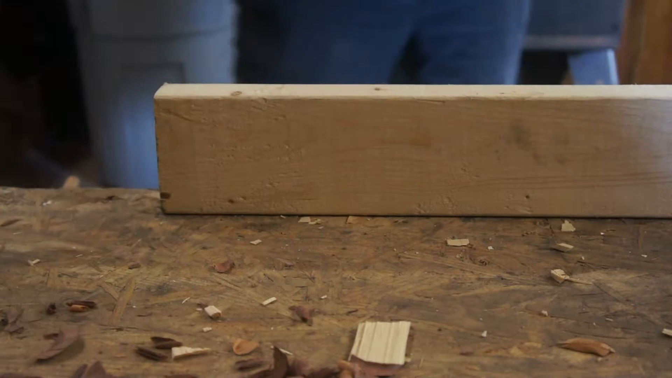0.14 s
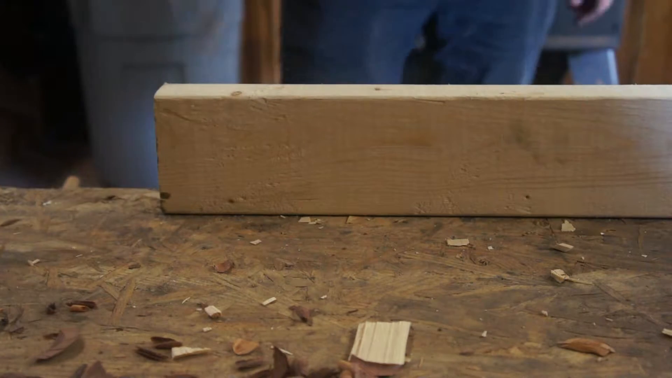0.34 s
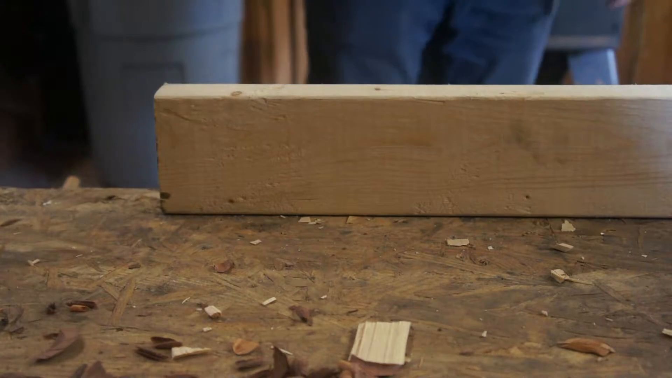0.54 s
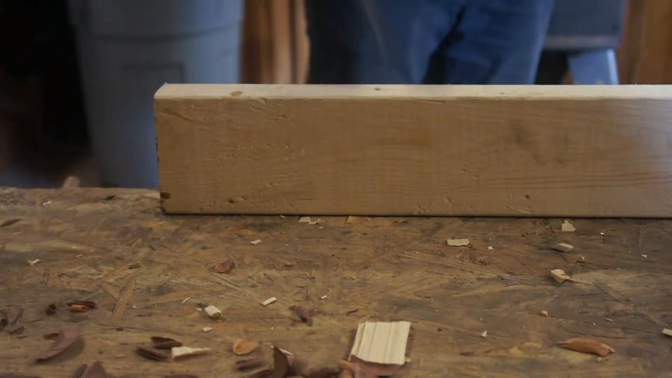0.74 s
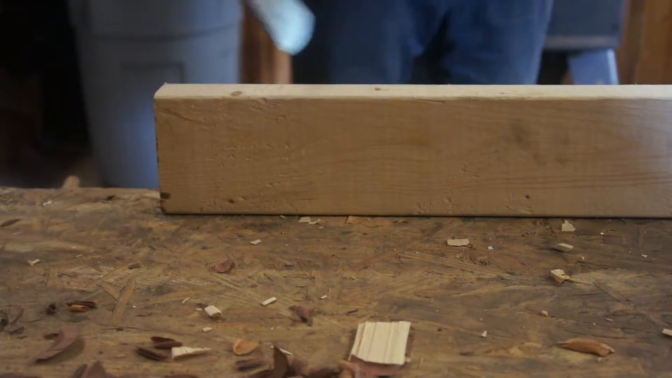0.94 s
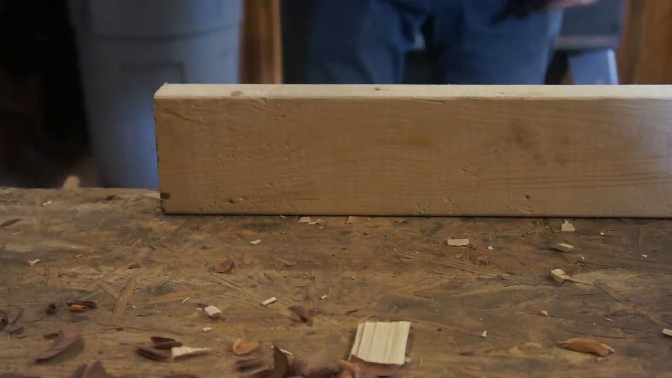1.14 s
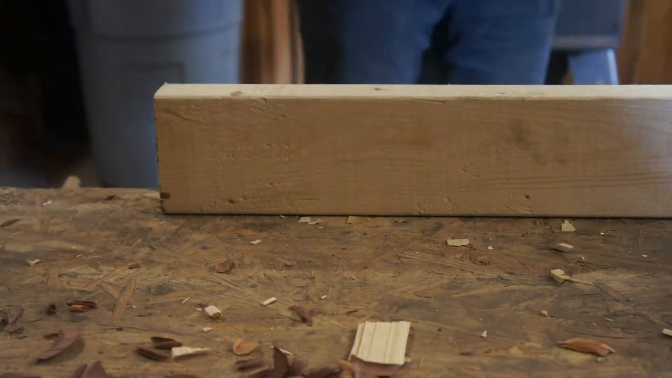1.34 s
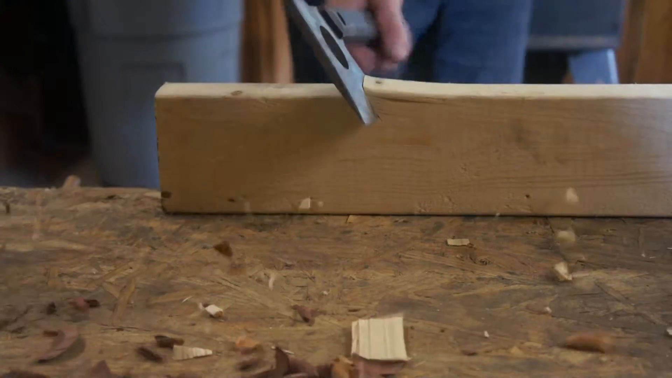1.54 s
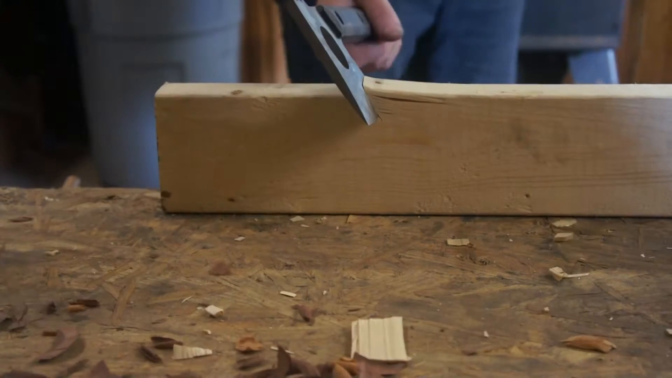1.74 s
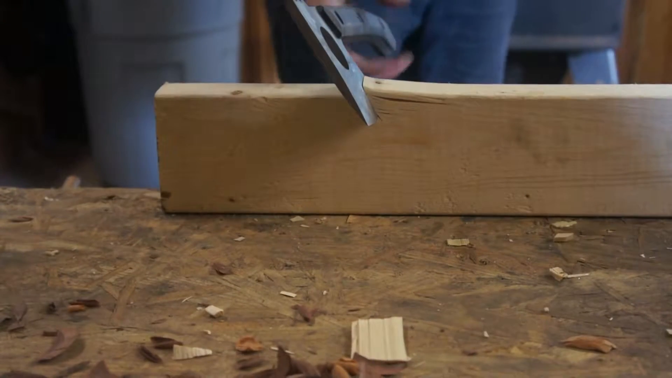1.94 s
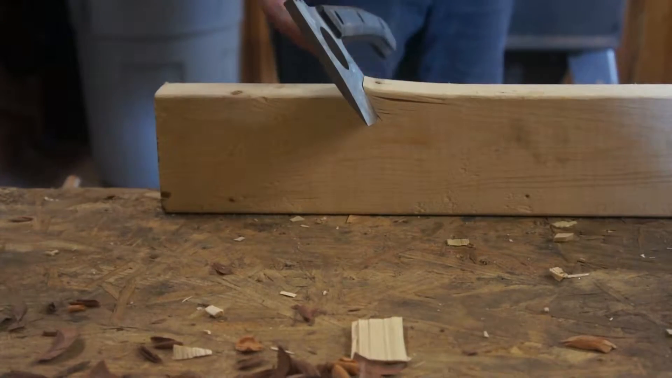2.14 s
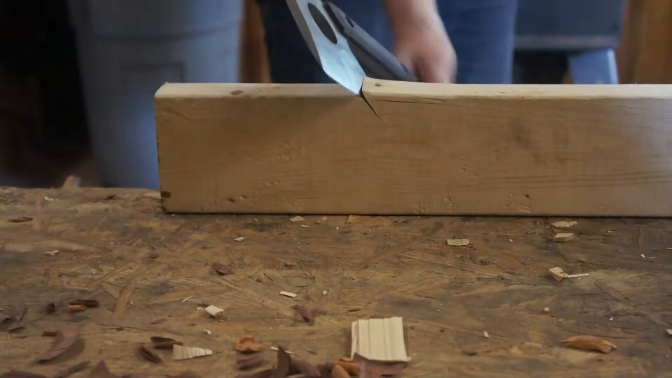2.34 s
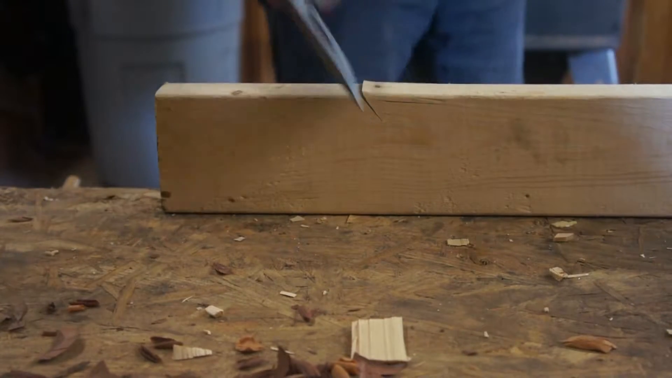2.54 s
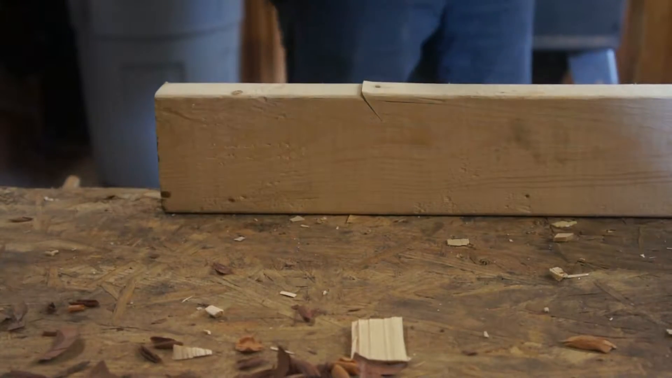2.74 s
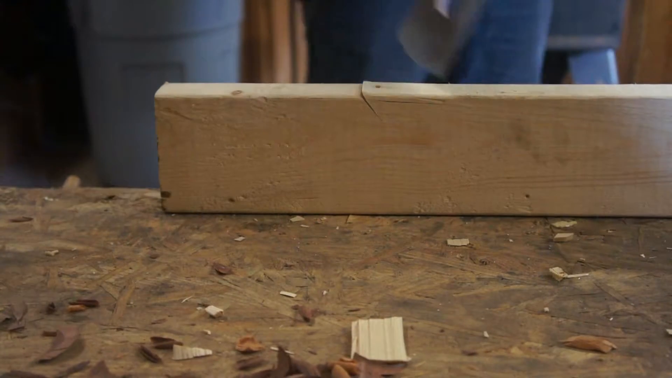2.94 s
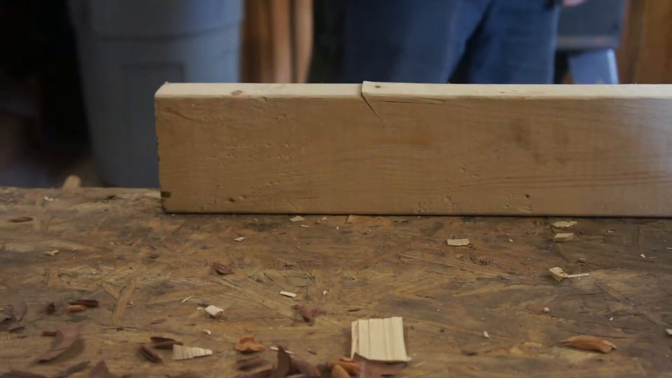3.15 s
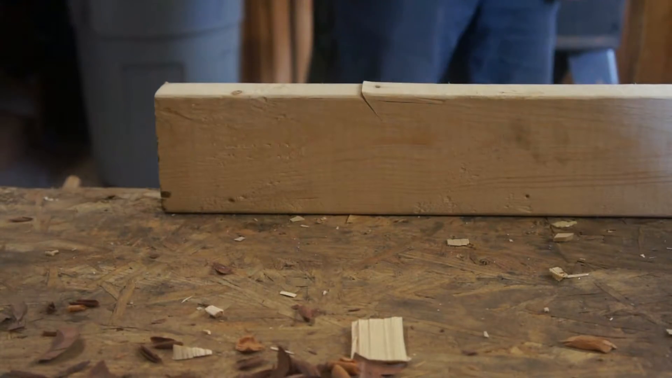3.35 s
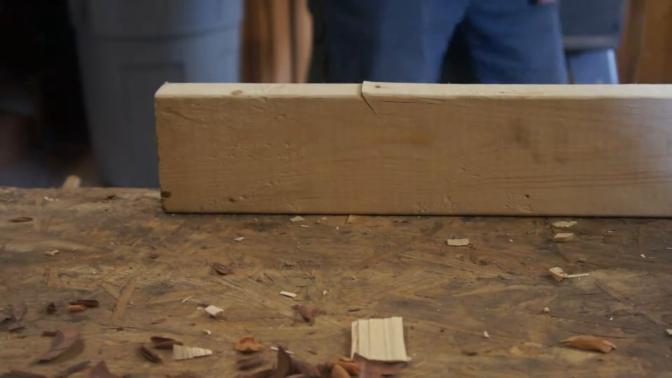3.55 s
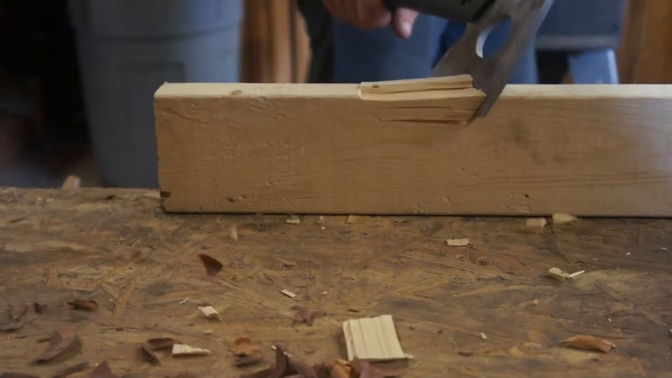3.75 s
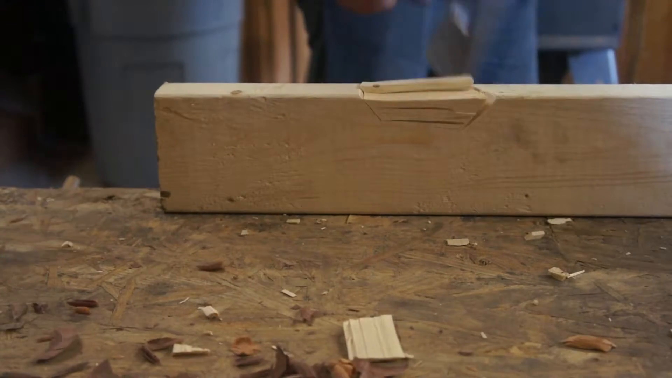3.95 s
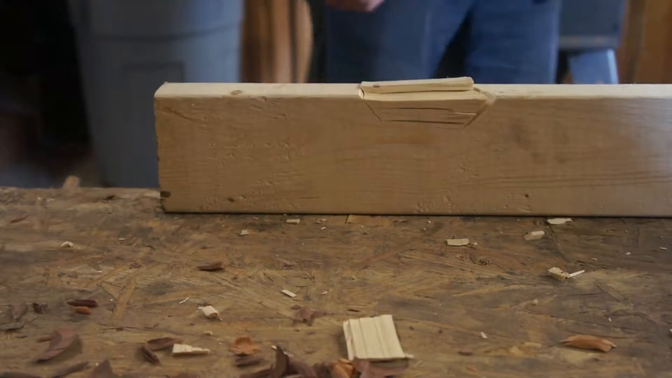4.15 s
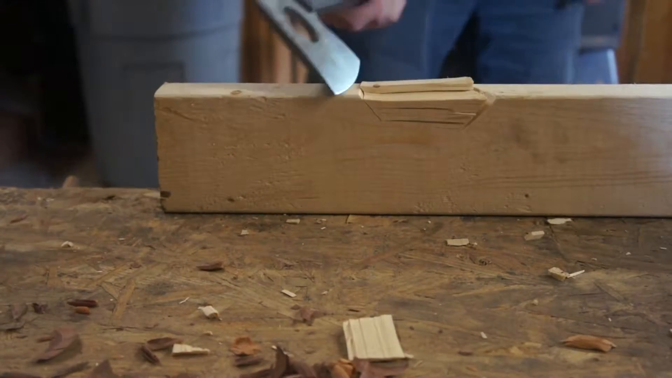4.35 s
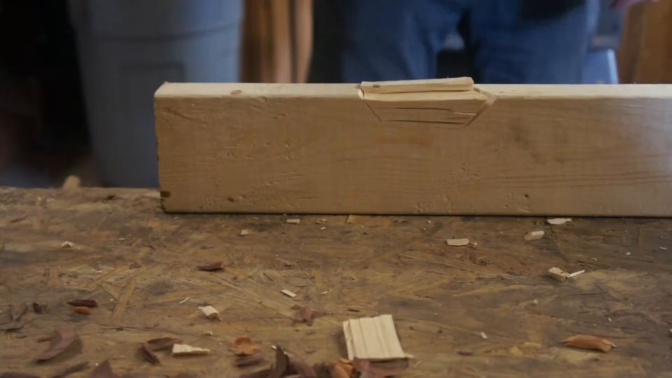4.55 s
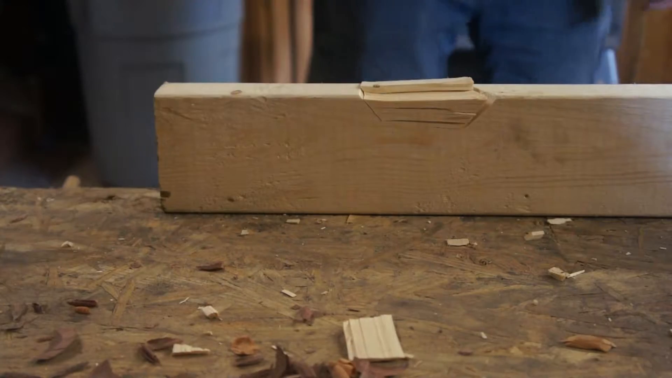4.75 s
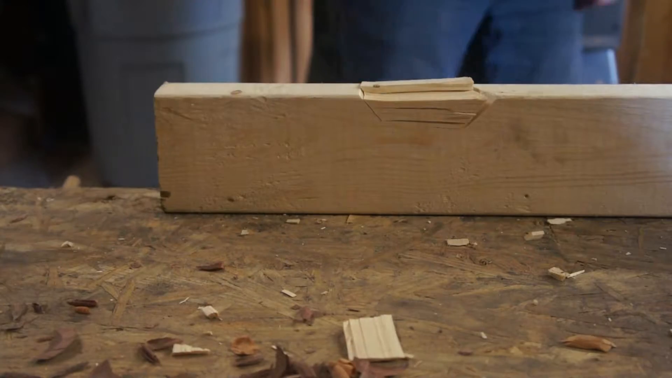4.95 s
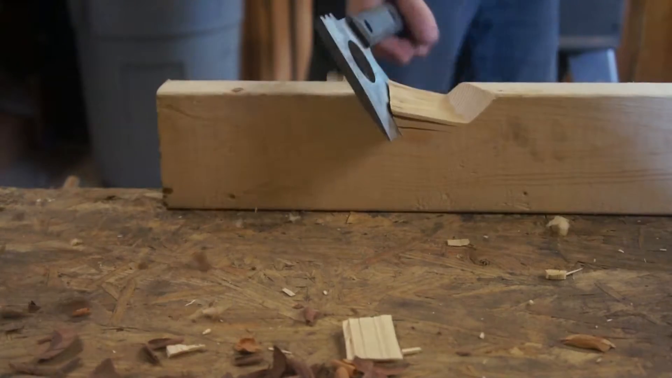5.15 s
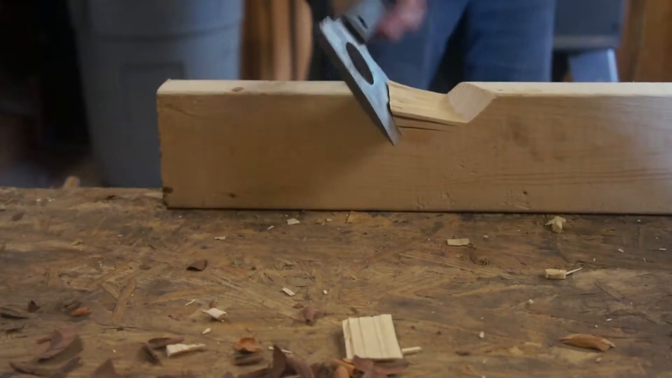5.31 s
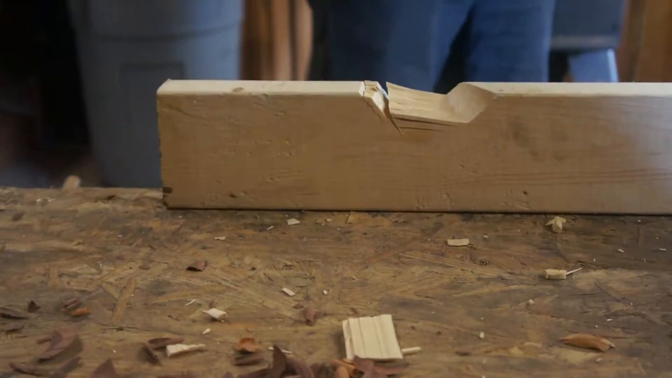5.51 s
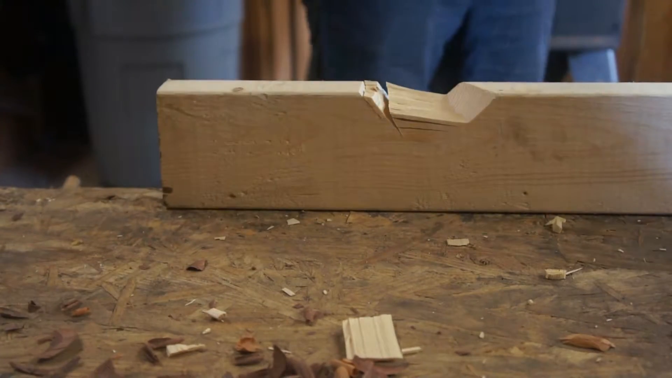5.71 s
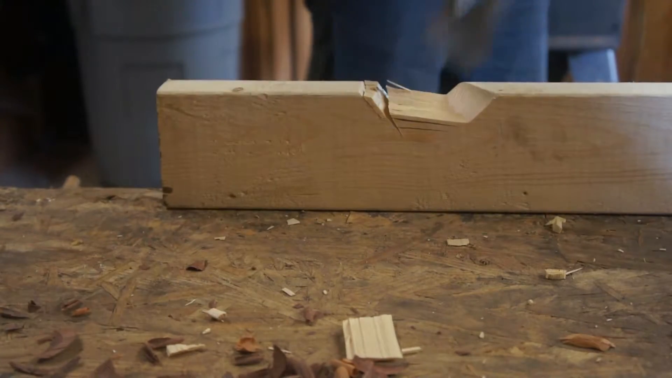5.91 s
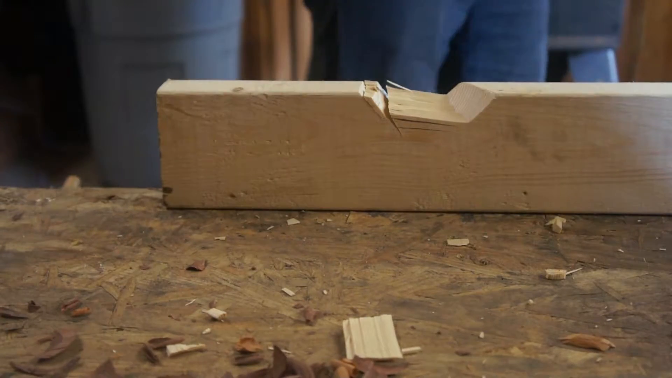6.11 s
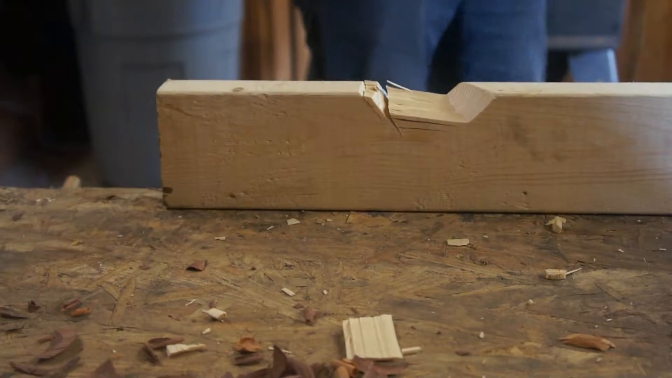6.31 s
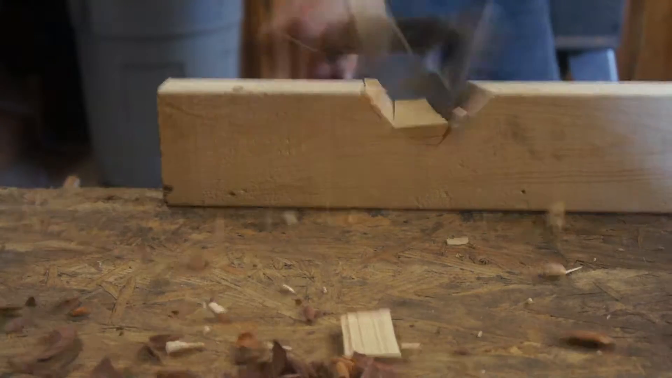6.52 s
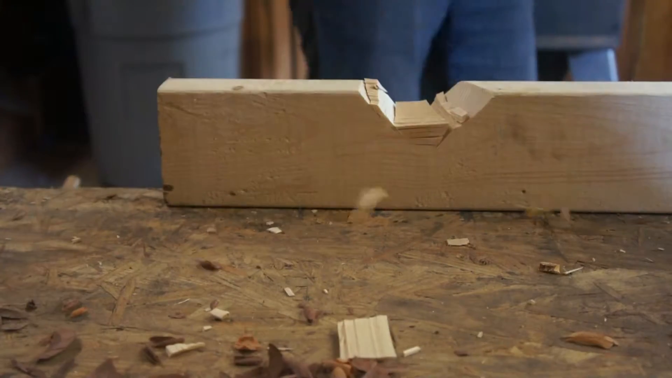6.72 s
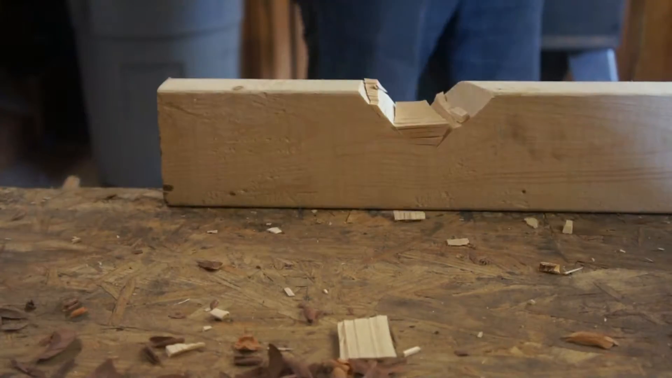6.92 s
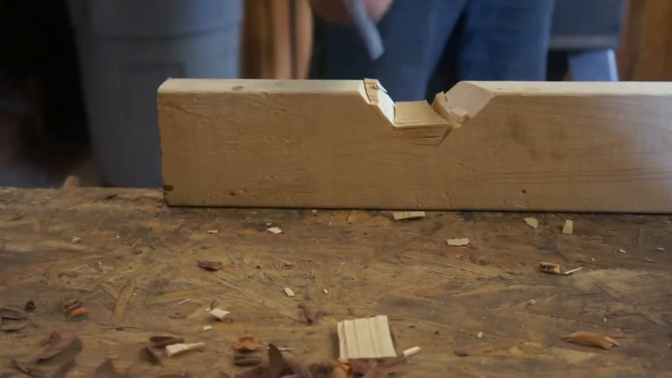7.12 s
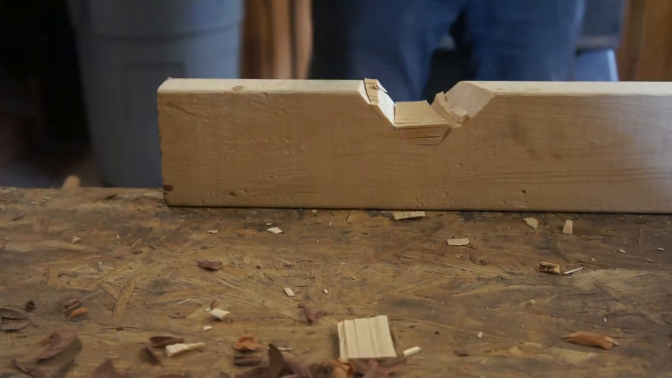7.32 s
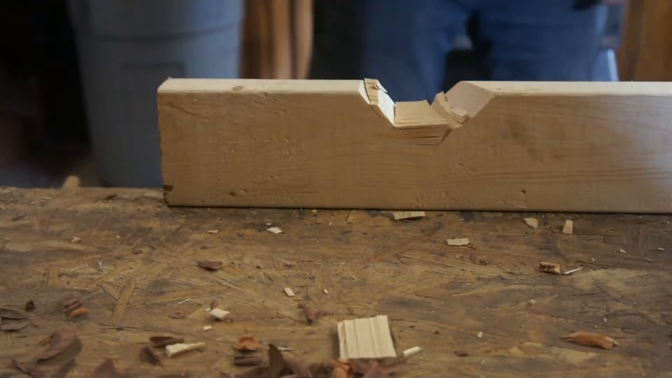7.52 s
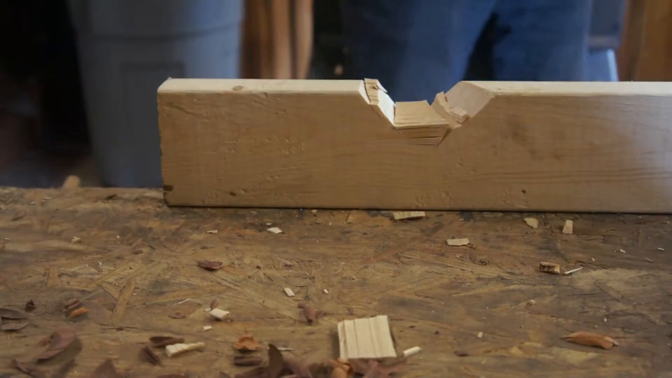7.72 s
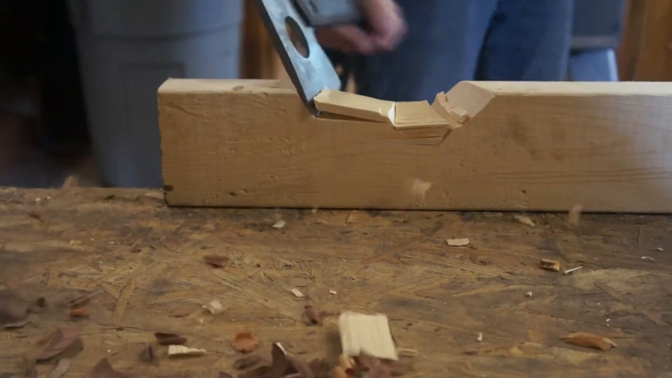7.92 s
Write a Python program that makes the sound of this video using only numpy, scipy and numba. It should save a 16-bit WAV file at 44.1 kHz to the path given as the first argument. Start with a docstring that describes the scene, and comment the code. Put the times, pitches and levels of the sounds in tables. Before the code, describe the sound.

A small shed, closely miked, with soft air hiss, faint mains hum and a low drone. For the first second and a half only faint boot and clothing scuffs are heard. At about 1.5 s a hatchet whistles down and hits a plank with a loud, fairly dull woody chop; the plank thumps near 1.9 s and the blade knocks loose at 2.3 s. Soft rubbing and a double knock follow around 3.0 s. A sharper crack lands at 3.6 s, then bounces, a cluster of knocks at 4.3 s and a fibre snap at 4.7 s. The brightest, hardest chop comes at 5.0 s, with a chip skipping in quick fading ticks from 5.3 to 5.75 s. Small clicks lead to another crack at 6.55 s, plank bounces near 6.9 and 7.2 s, splintery knocks, and a final chop at 7.8 s. Short echoes, squashed by loudness; right side stronger.

```python
"""Boots and sleeves scuff over shed hiss, hum and drone, as filtered noise and sines.
Then a hatchet whistles down and chops a plank on a workbench, five times: noise cracks and torn-fibre grains.
Between chops the plank bounces, chips snap, knock and skip: struck resonances with late noise echoes.
A fast gain control flattens the echo of hard blows; the left channel is weaker, of opposite polarity.
"""
import sys
import numpy as np
from scipy import signal
from scipy.fft import rfft, irfft, next_fast_len
from scipy.io import wavfile
from scipy.ndimage import uniform_filter1d
from numba import njit

SR = 44100
rng = np.random.default_rng(int(sys.argv[2]) if len(sys.argv) > 2 else 0)


def log_audio(samples):
    """Write samples as a 16-bit WAV file to the path given in sys.argv[1]."""
    # one column per channel
    frames = np.atleast_2d(samples).T
    # limit to full scale, then quantise
    limited = np.clip(frames, -1, 1)
    pcm = np.round(limited * 32767).astype(np.int16)
    wavfile.write(sys.argv[1], SR, pcm)


N = 355887

# All source levels are relative: tone, microphone gain and gain control follow.
# chops: start_s, blow_db, brightness_db, edge_crack_db, edge_pitch_hz (initial), favoured_band_hz
CHOPS = [(1.537, 18, -2.5, -16, 6940, 786), (3.639, 19.5, 0, 12.5, 6770, 2580),
         (5.038, 23, 9.5, 11, 5280, 3930), (6.5527, 22.5, 6.5, 8.5, 4550, 3470),
         (7.8356, 22.5, 3, 11.5, 6290, 4240)]
# chop colour: frequency_hz, gain_db
CHOP_COLOUR = [(40, -21), (110, -15.5), (200, -6), (330, -4.5), (560, -2), (830, -6), (1150, -9.5),
               (1600, -11.5), (4000, -18), (8000, -25), (12000, -31), (16000, -31)]
# plank landing on the bench: thud_s (contact begins 5 ms earlier), level_db, overtones_db
BOUNCES = [(1.916, -18, -1), (2.098, -33, -7), (3.042, -21.5, -4), (3.059, -29, -9), (3.993, -20.5, 0.5),
           (4.2, -28.5, -1), (5.388, -22.5, 0), (5.527, -37, 6), (5.624, -43.5, -1), (5.678, -46, 2),
           (6.078, -46, 4.5), (6.898, -19, 1), (7.106, -30.5, -4), (7.236, -20.5, -3)]
# plank bending modes: frequency_hz, width_hz, level_db
PLANK_MODES = [(194, 15, 2.5), (352.6, 40, 4), (480, 89, 1), (580, 78, 6), (716, 225, -3),
               (1686, 35, -14.5), (2780, 19, -16.5)]
# soft low thumps through the bench frame, several under knocks: start_s, level_db
THUMPS = [(2.266, -37), (2.678, -41), (3.04, -30), (4.359, -22.5), (5.732, -43), (5.911, -28.5)]
# bench frame modes: frequency_hz, width_hz, level_db
FRAME_MODES = [(122.5, 8.8, -5.5), (189, 19.4, -6)]
# bench top modes: frequency_hz, width_hz, level_db
BENCH_TOP_MODES = [(233, 310, -3.5), (396, 182, 4.5), (750, 470, -13)]
# steel and chips knocking wood:
# start_s, body_db, pitch_hz, body_width (share of pitch), note_db, bench_db, echo_db
KNOCKS = [(1.828, -19.5, 1193, 1.33, -26, -25, 9), (1.833, -42, 3900, .6, -37, -70, 14.5),
          (2.255, 3, 1840, 4.5, -23.5, -27, -1), (2.265, -22, 646, 1.1, -23, -23, 3),
          (2.266, -10.5, 3440, 0.42, -17, -9.5, -8), (3.035, -17.5, 1004, 0.55, -22, -5.5, -7),
          (3.924, -23.5, 800, 1.1, -34, -66, 8), (4.315, -8, 945, 0.94, -26, -49, -1),
          (4.32, -10, 1120, 1.24, -43, -20.5, 4.5), (4.323, -37, 3700, 0.51, -33, -50, -10),
          (4.33, -9, 2430, 0.44, -28, -50, -3), (4.335, -9, 1220, 0.69, -41, -50, -22),
          (4.338, -9.5, 1500, 0.88, -28, -50, -7), (4.361, -27, 1230, 5.8, -60, -33.5, 15.5),
          (4.7, -14, 1290, 2.1, -62, -62, 1), (4.95, -50, 3970, 1.1, -35.5, -81, 10),
          (5.799, -25, 1180, 5.6, -43, -36, 2.5), (5.894, -15, 3000, 5.1, -60, -62, -15),
          (5.9, 0, 2900, 4.3, -58, -20.5, -2), (5.973, -2, 2070, 2.72, -32, -31, 4.5),
          (5.981, -6, 5700, 1.9, -37, -57, 2), (6.22, -15.5, 1884, 3.8, -27.5, -67, 3.5),
          (6.23, -25.5, 4150, 0.47, -38, -52, 0.5), (6.328, -19.5, 2540, 4.3, -39, -68, 4),
          (6.457, -30, 4450, 2, -44, -68, 13), (6.655, -9.5, 850, 0.64, -13, -60, 3),
          (6.78, -44, 2880, 1.1, -34.5, -70, 14), (6.839, -38, 3850, .5, -41, -70, 13),
          (6.836, -23, 1020, 1.7, -28, -31.5, 10), (7.173, -8, 4700, 1.9, -60, -64, 5.5),
          (7.182, -21.5, 1400, 1.1, -33, -62, 5.5), (7.229, -4, 628, 1.9, -14.5, -4.5, -0.5),
          (7.452, -9.5, 2180, 1.5, -20.5, -40, 2.5), (7.513, -20.5, 930, 0.77, -44, -43, -1),
          (7.657, -24, 1376, 1.05, -29, -56, 2), (7.672, -37, 2340, 0.43, -31.5, -78, 2),
          (7.693, -26, 780, 0.81, -42, -58, 0), (7.729, -32, 1800, 0.95, -67, -42, 1)]
# modes of a loose piece: pitch_multiple, level_db
NOTE_MODES = [(1.001, 14), (2.03, -0.5), (3.3, -4)]
# parting fibres: start_s, level_db
SNAPS = [(2.255, -27), (4.701, -15.5), (5.599, -31.5), (7.232, -30), (7.454, -19)]
# chip touching the bench: start_s, lowest_mode_hz, upper_modes_db
SKIPS = [(5.279, 780, 2), (5.324, 850, -24), (5.368, 1120, -17), (5.496, 1120, -6), (5.548, 896.5, 2),
         (5.597, 1110, -8), (5.65, 780, -11), (5.706, 1160, -6), (5.746, 785, -13)]
# upper chip modes: frequency_hz, width_hz, level_db
CHIP_MODES = [(2470, 90, 3), (2960, 170, -6), (3980, 160, -8)]
# boot and cloth strokes: start_s, rise_s, hold_s, fall_s, level_db, brightness_db
SCUFFS = [(0.248, 0.086, 0.12, 0.32, -36, -3), (0.378, 0.1, 0.11, 0.18, -37, -10),
          (0.875, 0.075, 0.073, 0.31, -40, -9), (2.358, 0.11, 0.052, 0.24, -44, -4),
          (2.708, 0.047, .01, 1, -49, -9), (3.3, 0.13, 0.086, 0.29, -47.5, -6),
          (3.904, 0.068, 0.0056, 0.13, -40, 4.5), (4.925, 0.028, 0.011, 0.73, -48, 0.3),
          (5.22, 0.21, 0.034, 0.13, -43, -2.5)]
# scuff spectra, low and high part: frequency_hz, relative_db
SCUFF_LOW = [(150, -28), (400, -5.5), (960, 3.5), (1950, 6), (3200, 3), (5000, -4), (6500, -7),
             (11000, -90)]
SCUFF_HIGH = [(2000, -70), (2800, -20), (4000, -9), (6500, -7), (10500, -6.5), (12000, -12), (13200, -16),
              (17000, -70)]
# shed air spectrum: frequency_hz, relative_db
HISS = [(30, -24), (60, 0), (120, 2), (300, 1.5), (750, 1), (2000, -5.5), (5000, -10), (9000, -14),
        (12300, -18), (13200, -50), (20000, -70)]
# mains hum partials: frequency_hz, relative_db
HUM = [(120, -62), (240, -61), (480, -61.5)]
# low drone level: time_s, relative_db
DRONE = [(0.0, -83), (0.83, -74), (0.99, -67), (3, -68), (8.07, -70.5)]
# shed reverberation: frequency_hz, t60_s
SHED_T60 = [(100, 0.64), (400, 0.37), (1500, 0.43), (5000, 0.36), (11000, 0.31), (13000, 0.12)]
# left gain over right: frequency_hz, gain_db
LEFT_GAIN = [(60, -10), (500, -11.3), (1000, -11.3), (2000, -10.5), (4000, -7), (8000, -14), (13000, -14)]
# left phase lag: frequency_hz, lag_rad
LEFT_LAG = [(260, 0.05), (2240, .5), (4500, .95), (12000, 1.35)]
# likeness of the two microphones: frequency_hz, likeness (0-1)
ALIKE = [(60, .93), (300, .995), (1400, .94), (4000, .8), (9000, .75)]
# overall tone, low cut and steep treble cut: frequency_hz, gain_db
RECORDING_TONE = [(30, -13), (70, -11.5), (130, -1), (11800, -2), (13000, -16.5), (17000, -112)]

EDGE_SINK_S, EDGE_T60_S, EDGE_HISS_DB = 0.0037, 0.026, 0.5  # pitch drops as the edge sinks in
FLOOR_ECHO_S, FLOOR_ECHO_DB = 0.0098, -5.5  # edge crack returns once off the floor
SPLITS, SPLIT_DB, SPLIT_FADE_T60_S, SPLIT_SPREAD_DB = 200, -28, 0.49, 2.5  # torn fibres per chop
SPLIT_HZ, SPLIT_SPREAD_OCTAVES, SPLIT_CYCLES = 2200, .8, 3  # a grain loses 20 dB in SPLIT_CYCLES
CHOP_BENCH_DB = -20  # bench top, relative to the blow
BAND_LIFT_DB, BAND_WIDTH_OCTAVES = 2.5, 0.33
LANDING_S, KNOCK_RISE_S = 0.0021, 0.0011
CORNER_LEAD_S, CORNER_DB = 0.0026, -5.5  # one corner lands first, softer
NOTE_TOP_HZ, FRAME_DB = 4400, -32  # note modes fade above; frame relative to bench top
SKIP_DB, SKIP_LOSS_DB_PER_S = -25, 21
SCUFF_DEPTH_DB, TREBLE_LOSS_DB_PER_DB = 31.5, 0.074  # stroke depth; extra treble loss per dB down
HISS_DB = -55.5
SHUDDER_DB, SHUDDER_RISE_S, SHUDDER_T60_S = -80.5, 0.17, 3.6  # drone swell, relative to the blow
WALL_DELAY_S, WALL_RISE_S = 0.0043, 0.0047
ECHO_PATCH_DB = 2.1  # rms variation of the echoes over time and frequency
TOP_HZ, TOP_SLOPE_HZ = 16200, 1000


def chop_whistle():
    """Air over the falling blade: a sine rising in pitch and level until impact."""
    t = np.arange(-round(0.04 * SR), 0) / SR
    return amp(-30.5 + 930 * t) * np.sin(2 * np.pi * (860 * t + 1500 * t * t))


def cut_response(bright_db, band_hz):
    """Wood colour of one cut: random resonances, one favoured band, a treble tilt."""
    grain_db = rng.normal(0, 2.6, size=40) * np.linspace(1, .4, num=40)
    grain = list(zip(np.geomspace(150, 7000, num=40), grain_db))

    def response(hz):
        octaves = np.log2(hz / band_hz + 1e-9)
        band_db = BAND_LIFT_DB * np.exp(-(octaves / BAND_WIDTH_OCTAVES) ** 2)
        tilt_db = bright_db * np.log10(1 + hz / 1000)
        return causal(along(CHOP_COLOUR, hz) + along(grain, hz) + band_db + tilt_db)
    return response


def splitting_crack():
    """The blow as a noise burst, then fibres tearing as short decaying sines, ever softer on average."""
    crack, after_s = np.zeros(SR // 3), rng.random(size=SPLITS) / 4
    pitch_hz = SPLIT_HZ * 2 ** rng.normal(0, SPLIT_SPREAD_OCTAVES, size=SPLITS)
    cycles = np.outer(pitch_hz, np.arange(256) / SR)
    level_db = SPLIT_DB - 60 * after_s / SPLIT_FADE_T60_S
    level_db = level_db + SPLIT_SPREAD_DB * rng.standard_normal(size=SPLITS)
    splits = amp(level_db[:, None] - 20 * cycles / SPLIT_CYCLES) * np.sin(2 * np.pi * cycles)
    np.add.at(crack, (after_s * SR).astype(int)[:, None] + np.arange(256), splits)
    blow = peak(puff(0.021), 0)
    crack[:len(blow)] += blow
    return crack


def edge_crack(level_db, pitch_hz):
    """Hiss plus a jittery tone whose pitch falls exponentially as the edge sinks in."""
    hiss = peak(np.diff(puff(0.02)), EDGE_HISS_DB)
    t = np.arange(len(hiss)) / SR
    sweep = 2 * np.pi * pitch_hz * EDGE_SINK_S * (1 - np.exp(-t / EDGE_SINK_S))
    jitter = np.cumsum(rng.normal(0, .3, size=len(t)))
    envelope = amp(-60 * t / EDGE_T60_S) * (1 - np.exp(-t / KNOCK_RISE_S))
    return amp(level_db) * (hiss + np.sin(sweep + jitter) * envelope)


def chops():
    """The whistling blade strikes; the crack excites plank and bench, the edge cracks directly."""
    out, whistle = np.zeros((2, N)), chop_whistle()
    for s, db, bright_db, edge_db, edge_hz, band_hz in CHOPS:
        start = round(s * SR)
        out[0, start - len(whistle):start] += whistle
        add(out, s, loud(cut_response(bright_db, band_hz)), db, splitting_crack(), echo_db=1.5)
        add(out, s + 0.0024, loud(modes(BENCH_TOP_MODES)), db + CHOP_BENCH_DB, np.ones(1), echo_db=1.5)
        edge = edge_crack(edge_db, edge_hz)
        out[0, start:][:len(edge)] += edge
        out[0, round((s + FLOOR_ECHO_S) * SR):][:len(edge)] += amp(FLOOR_ECHO_DB) * edge
    return out


def bounces():
    """Two soft corner contacts excite low plank bending modes; the hard edge adds overtones."""
    out = np.zeros((2, N))
    touch, lead = np.hanning(round(LANDING_S * SR) + 3), round(CORNER_LEAD_S * SR)
    contact = amp(CORNER_DB) * np.pad(touch, (0, lead)) + np.pad(touch, (lead, 0))
    for thud_s, db, over_db in BOUNCES:
        def colour(f):
            soft = modes([(400, 300, 0)])(f) ** 2
            hard = modes([(1500, 2500, 0)])(f) ** 2
            return modes(PLANK_MODES)(f) * (soft + amp(over_db) * hard)
        add(out, thud_s - .005, loud(colour), db - 2.0, contact, echo_db=10.5)
    return out


def thumps():
    """Soft low thumps: impulses ring the bench frame modes through a two-pole lowpass."""
    out = np.zeros((2, N))
    thump = loud(lambda f: modes(FRAME_MODES)(f) / (1 + 1j * f / 300) ** 2)
    for s, db in THUMPS:
        add(out, s, thump, db, np.ones(1), echo_db=-2.5)
    return out


def note_response(pitch_hz):
    """Narrow modes of a loose piece, weaker above NOTE_TOP_HZ."""
    def response(f):
        total = 0
        for multiple, db in NOTE_MODES:
            hz = multiple * pitch_hz
            gain = amp(db) / (1 + (hz / NOTE_TOP_HZ) ** 6)
            total = total + gain * modes([(hz, .09 * pitch_hz, 0)])(f) ** 2
        return total
    return response


def knocks():
    """A noisy contact excites a broad body, bench top and frame; an impulse rings the piece's note."""
    out = np.zeros((2, N))
    top, frame = loud(modes(BENCH_TOP_MODES)), loud(modes(FRAME_MODES))
    for s, db, hz, width, note_db, bench_db, echo_db in KNOCKS:
        body = loud(lambda f: modes([(hz, np.clip(width, .5, 5) * hz, 0)])(f) ** 2)

        def colour(f):
            return amp(db) * body(f) + amp(bench_db) * (top(f) + amp(FRAME_DB) * frame(f))
        contact = puff(0.029)
        contact = contact * (1 - np.exp(-np.arange(len(contact)) / (KNOCK_RISE_S * SR)))
        add(out, s, colour, 0, contact, echo_db, size=SR // 2)
        add(out, s + 0.000725, loud(note_response(hz)), note_db, np.ones(1), echo_db - 4.5, size=SR // 3)
    return out


def snaps():
    """Parting fibres: noise bursts through a broad treble resonance."""
    out = np.zeros((2, N))
    treble = loud(lambda f: modes([(7500, 7000, 0)])(f) ** 2)
    for s, db in SNAPS:
        add(out, s, treble, db, puff(0.014), echo_db=4.5)
    return out


def skips():
    """A chip rings at each touch, ever softer; the corner that lands sets its modes."""
    out = np.zeros((2, N))
    for s, hz, upper_db in SKIPS:
        def colour(f):
            upper = modes(CHIP_MODES)(f) + amp(-24.5) * modes([(3000, 5000, 0)])(f)
            return modes([(hz, 170, 0)])(f) ** 2 + amp(upper_db) * upper
        db = SKIP_DB - SKIP_LOSS_DB_PER_S * (s - SKIPS[0][0])
        add(out, s, loud(colour), db, np.ones(1), echo_db=-8)
    return out


def scuffs():
    """Rubbing: gritty filtered noise, brightest at full pressure."""
    t, low, high = np.arange(N) / SR, np.zeros(N), np.zeros(N)
    for s, rise, hold, fall, db, bright_db in SCUFFS:
        corners_s = s + np.cumsum([0, rise, hold, fall])
        down_db = SCUFF_DEPTH_DB * np.interp(t, corners_s, [1, 0, 0, 1], 4, 4)  # 4: far down outside
        low = np.hypot(low, amp(db - down_db))
        high = np.hypot(high, amp(db + bright_db - (1.0 + TREBLE_LOSS_DB_PER_DB) * down_db))
    grit = unit(amp(0.58 * unit(uniform_filter1d(rng.standard_normal(N), 120))))
    rubbing = low * coloured(SCUFF_LOW) + high * coloured(SCUFF_HIGH)
    return grit * patchy(rubbing, patchy_db=1.0)


def mains_hum():
    """Steady mains harmonics of random phase."""
    t = np.arange(N) / SR
    return sum(amp(db - 9.5) * np.sin(2 * np.pi * hz * t + 6 * rng.random()) for hz, db in HUM)


def low_drone():
    """Low band noise of drifting level, swelling and fading after each chop."""
    t = np.arange(N) / SR
    level = amp(np.interp(t, *np.transpose(DRONE)))
    for s, db, *_ in CHOPS:
        since_s = np.clip(t - s, 0, None)
        swell = np.clip(since_s / SHUDDER_RISE_S, 0, 1)
        level += amp(db + SHUDDER_DB - 60 * since_s / SHUDDER_T60_S) * swell
    return level * coloured([(40, -40), (55, 3), (95, 13.0), (120, -27)])[0]


def shed_air():
    """Hum and drone shared in opposite polarity; hiss mostly unrelated between channels."""
    low = mains_hum() + low_drone()
    hiss = amp(HISS_DB) * coloured(HISS)
    left = -amp(4.5) * hiss[1] - amp(-7.0) * hiss[0] - amp(9.5) * low
    right = amp(9.5) * hiss[0] + amp(19.5) * low
    return np.array([left, right])


def add(out, s, colour, db, contact, echo_db, size=SR * 3 // 4):
    """Adds a hit and its noise echo; row 0 is shared by both microphones, row 1 is unrelated echo."""
    hz, t, z = signal.stft(rng.standard_normal((2, size)), SR, nperseg=256)
    z = z * amp(ECHO_PATCH_DB * patches(z.shape[1:], bins=3, frames=6))
    decay = amp(-60 * t / along(SHED_T60, hz)[:, None])
    tail = signal.istft(z * decay, SR, nperseg=256)[1]
    wall = np.clip((np.arange(tail.shape[1]) / SR - WALL_DELAY_S) / WALL_RISE_S, 0, 1)
    tail *= amp(echo_db) / np.linalg.norm(tail[0]) * wall  # the walls answer late
    tail[0, :len(contact)] += contact / np.linalg.norm(contact)
    part = out[:, round(s * SR):][:, :tail.shape[1]]
    part += amp(db) * filtered(tail, colour)[:, :part.shape[1]]


def puff(fade_s):
    """A 60 ms noise burst: decaying noise is spectrally flattened, then faded 20 dB per fade_s."""
    t = np.arange(round(.06 * SR)) / SR
    z = rfft(rng.standard_normal(len(t)) * amp(-60 * t / fade_s))
    return irfft(z / np.abs(z)) * amp(-20 * t / fade_s)


def patches(shape, bins, frames):
    """Random field of rms 1, smoothed over frequency bins and time frames."""
    field = uniform_filter1d(rng.standard_normal(shape), size=bins, axis=0)
    return unit(uniform_filter1d(field, size=frames, axis=1))


def patchy(x, patchy_db):
    """Random patches of gain that drift in time and frequency."""
    z = signal.stft(x, nperseg=512)[2]
    gain = amp(patchy_db * patches(z.shape[1:], bins=7, frames=9))
    return signal.istft(z * gain, nperseg=512)[1][:, :N]


def coloured(spectrum):
    """Two unrelated noises of joint rms 1."""
    return unit(filtered(rng.standard_normal((2, N)), lambda hz: amp(along(spectrum, hz))))


def modes(table):
    """Causal sum of resonances (frequency_hz, width_hz, level_db) of alternating sign."""
    def response(f):
        total = 0
        for k, (centre, width, db) in enumerate(table):
            damping = 1j * f * width
            total = total + (-1) ** k * amp(db) * damping / (centre * centre - f * f + damping)
        return total
    return response


def loud(response):
    """Scales a response so that its impulse response peaks at 1."""
    def scaled(f):
        shape = response(f)
        return shape / np.abs(irfft(shape)).max()
    return scaled


def causal(spectrum_db):
    """Minimum-phase response for a gain in dB on the FFT grid, by folding the cepstrum."""
    c = irfft(np.log(amp(spectrum_db)))
    c[1:len(c) // 2] *= 2
    c[len(c) // 2 + 1:] = 0
    return np.exp(rfft(c))


def filtered(x, response):
    """x times a complex response of frequency, zero-padded."""
    m = 2 * next_fast_len(x.shape[-1] // 2 + 4096)
    return irfft(rfft(x, m) * response(np.fft.rfftfreq(m, 1 / SR)), m)[..., :x.shape[-1]]


def along(points, hz):
    """Interpolates (frequency_hz, value) points on a log frequency axis."""
    f, v = np.transpose(points)
    return np.interp(np.log(hz + 1), np.log(f + 1), v)


def amp(db):
    """Amplitude ratio for a level in dB."""
    return 10 ** (np.asarray(db) / 20)


def unit(x):
    """x scaled to rms 1."""
    return x / np.sqrt(np.mean(x ** 2) + 1e-20)


def peak(x, db):
    """x scaled to a peak level in dB."""
    return amp(db) * x / np.abs(x).max()


def microphones(sound):
    """Right hears the shared row; left is inverted, weaker, phase-lagged, with the unrelated row mixed in."""
    def left_response(hz):
        alike = np.clip(along(ALIKE, hz), 0, 1)
        gain = -amp(along(LEFT_GAIN, hz)) * np.exp(-1j * along(LEFT_LAG, hz))
        return gain * np.array([alike, np.sqrt(1 - alike ** 2)])
    left = filtered(sound, left_response).sum(axis=0)
    return amp(10.0) * np.array([left, sound[0]])


def scene():
    """All sources at the microphones, over the shed air."""
    sources = chops() + bounces() + thumps() + knocks() + snaps() + skips() + scuffs()
    return microphones(sources) + shed_air()


@njit
def follow(level, rise, fall):
    """Peak follower with a quick rise and a slower fall."""
    out, held = np.empty_like(level), 0.
    for i in range(len(level)):
        held += (rise if level[i] > held else fall) * (level[i] - held)
        out[i] = held
    return out


def record(dry):
    """Overall tone, one gain control for both channels (a blow's first ms passes and clips), lowpass."""
    heard = filtered(dry, lambda hz: causal(along(RECORDING_TONE, hz)))
    level = follow(np.abs(heard).max(axis=0), 1 / (0.0013 * SR), 1 / (0.02 * SR))  # rise_s, fall_s
    limited = np.clip(heard / np.maximum(1, level / amp(-6.5)), -1, 1)
    lowpassed = filtered(limited, lambda hz: np.clip((TOP_HZ - hz) / TOP_SLOPE_HZ + .5, 0, 1) ** 2)
    return np.clip(lowpassed, -1, 1)


dry = scene()
out = record(dry)
log_audio(out)
```